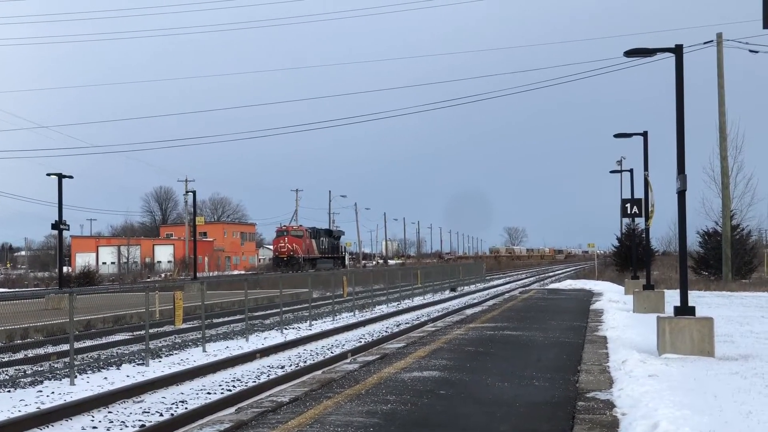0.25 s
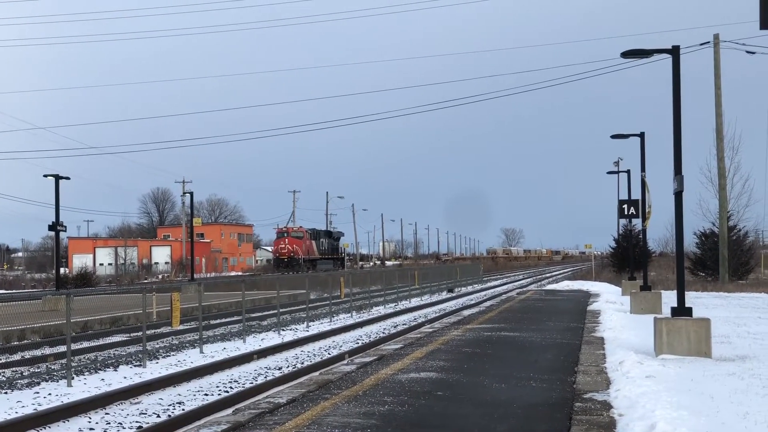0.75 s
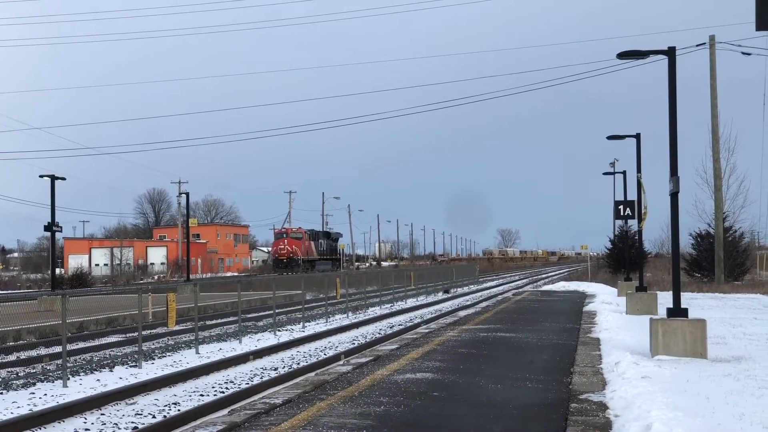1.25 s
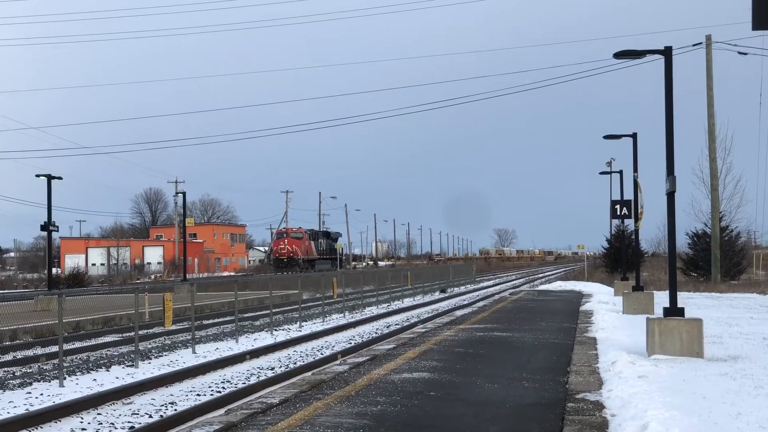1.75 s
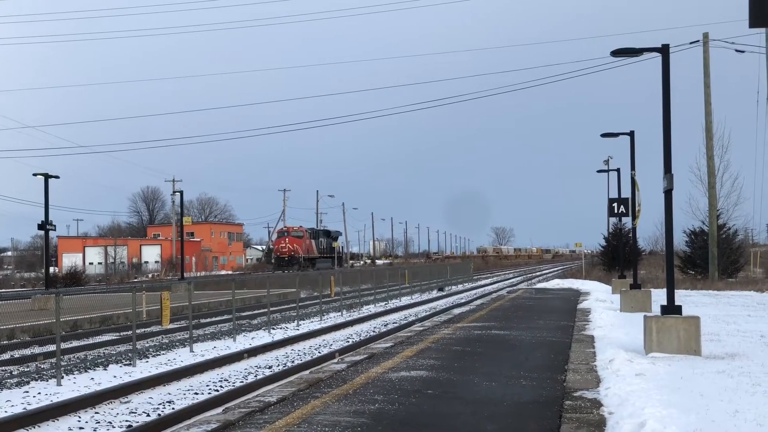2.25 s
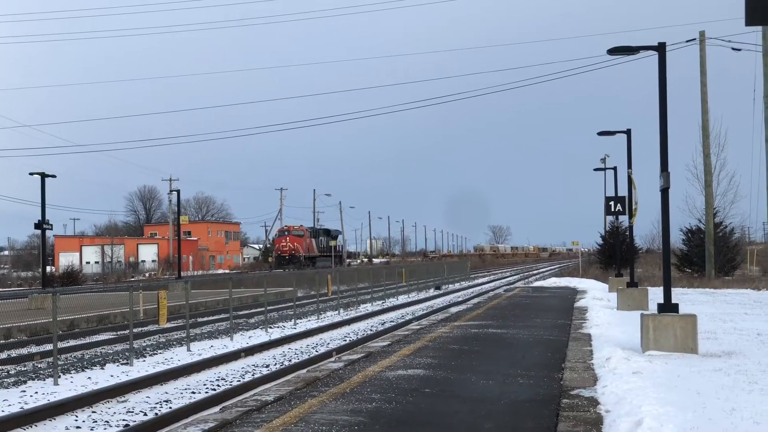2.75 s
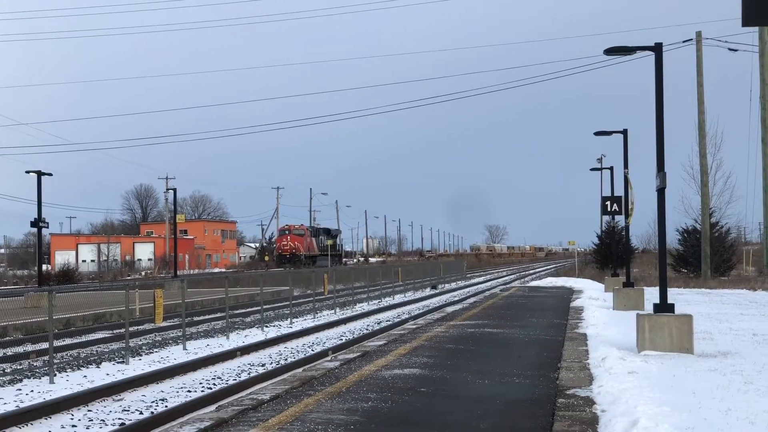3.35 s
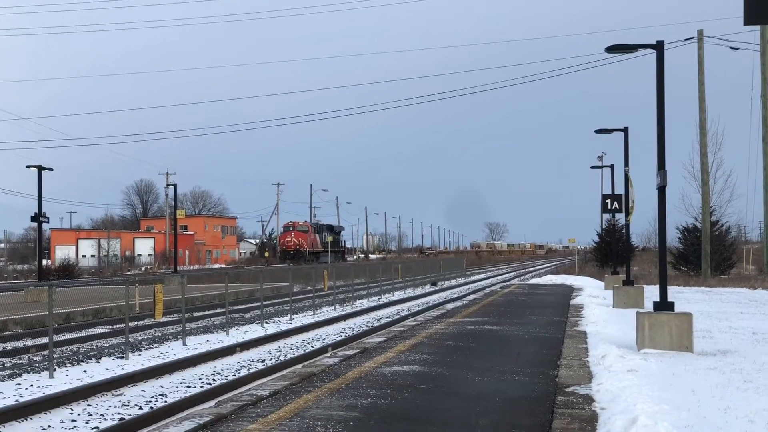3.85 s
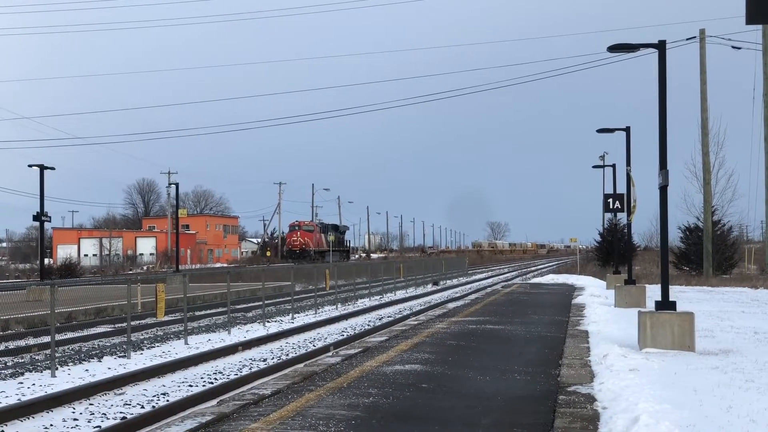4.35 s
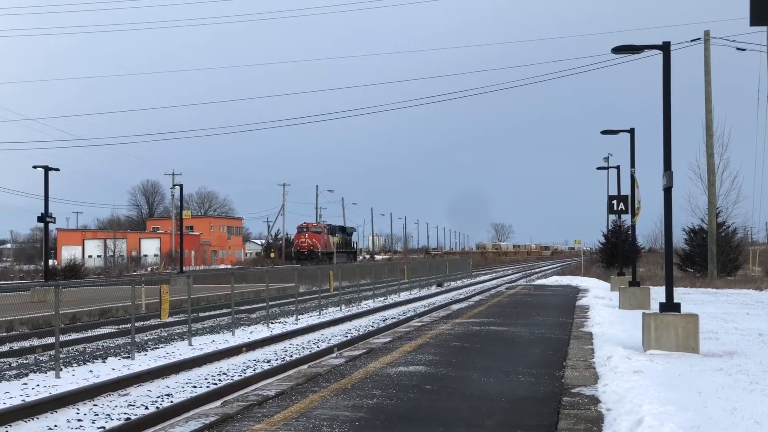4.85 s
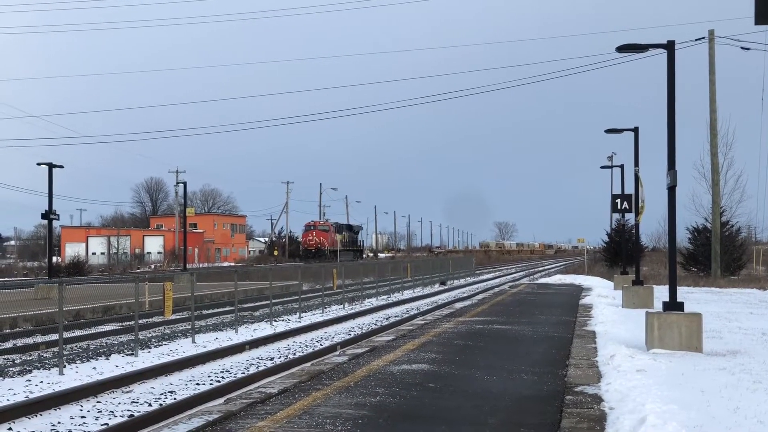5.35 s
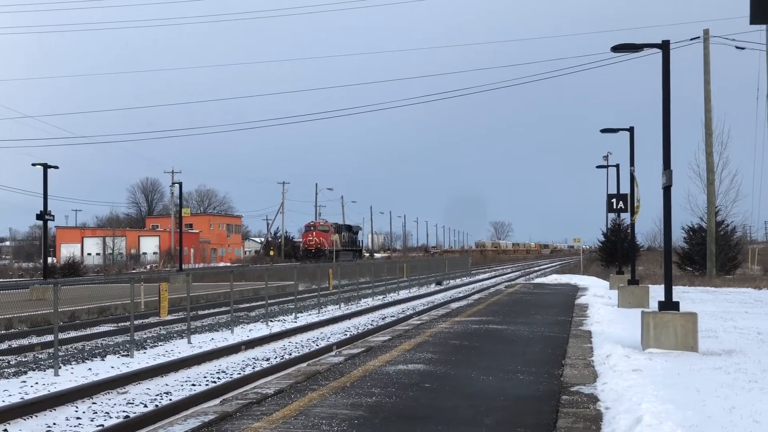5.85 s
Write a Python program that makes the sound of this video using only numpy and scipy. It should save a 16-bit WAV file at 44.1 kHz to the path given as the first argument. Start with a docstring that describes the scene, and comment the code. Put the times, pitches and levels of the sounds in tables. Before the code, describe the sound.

Low far-off engine rumble with faint fan whine and rolling roar, under breezy hiss, rustling twigs and one long buffeting gust.

```python
"""Distant diesel from a windy platform

A twelve-cylinder diesel locomotive creeps along at low throttle, far from a single microphone.
Its firing tone, overtones and chuffing gas make a throbbing drone; blade tones whine from its fans,
filtered noise makes the steady roar of machinery and wheels, and the wheels sing and squeal faintly.
Close by, shaped noise is the wind: it hisses and rustles dry twigs, and its eddies rumble and thump
on the microphone, hardest in one long gust. Faint chirps and the microphone's own hiss lie beneath."""
import sys
import numpy as np
from scipy import signal
from scipy.fft import rfft, irfft, next_fast_len
from scipy.io import wavfile
from scipy.ndimage import uniform_filter1d, map_coordinates

SR = 44100
rng = np.random.default_rng(int(sys.argv[2]) if len(sys.argv) > 2 else 0)


def store_pcm(level_fs):
    """Save levels as 16-bit WAV."""
    pcm = np.round(np.clip(level_fs, -1, 1) * 32767).astype(np.int16)
    wavfile.write(sys.argv[1], SR, np.atleast_2d(pcm).T)


N = 269451
T = np.arange(N) / SR  # time of each sample, s
CYLINDERS = 12


def amp(db):
    """Decibels to gain."""
    return 10 ** (np.asarray(db) / 20)


def unit(x):
    """Scale to rms 1."""
    return x / np.sqrt(np.mean(x ** 2) + 1e-20)


def curves(rows):
    """One value per sample, joined by straight lines, for each column after the time."""
    s, *columns = np.transpose(rows)
    return [np.interp(T, s, column) for column in columns]


def swell(s, width_s):
    """A bell that peaks at 1 at time s; width_s is its standard deviation."""
    return np.exp(-0.5 * ((T - s) / width_s) ** 2)


def wobble(rate):
    """A smooth random curve of rms 1, with rate knots a second."""
    knots = rng.standard_normal(int(N * rate / SR) + 4)
    return unit(map_coordinates(knots, [np.arange(N) * rate / SR]))


def filtered(x, response):
    """x times a response of frequency, padded so that the end does not wrap to the start."""
    m = next_fast_len(N + SR // 2)
    return irfft(rfft(x, m) * response(np.fft.rfftfreq(m, 1 / SR)), m)[:N]


def coloured(x, spectrum):
    """x shaped by (Hz, dB) points on a log axis, silent above the last."""
    f, db = np.transpose(spectrum)
    return filtered(x, lambda hz: amp(np.interp(np.log(hz + 1), np.log(f), db, right=-np.inf)))


def resonant(x, modes):
    """x through parallel (Hz, width Hz, dB) resonances, each squared for steep skirts."""
    def response(f):
        total = 0
        for centre, width, db in modes:
            peak = 1j * f * width / (centre * centre - f * f + 1j * f * width)
            total = total + amp(db) * peak ** 2
        return total
    return filtered(x, response)


def noise(patchy_db):
    """White noise that fades in patches of time and pitch, as sound does through moving air."""
    z = signal.stft(rng.standard_normal(N), nperseg=1024)[2]
    field = uniform_filter1d(rng.standard_normal(z.shape), size=6, axis=0)  # smooth across pitch
    field = uniform_filter1d(field, size=10, axis=1)  # smooth across time
    return signal.istft(z * amp(patchy_db * unit(field)), nperseg=1024)[1][:N]


def mic_hiss(floor_db=-72):
    """The microphone's own faint, steady hiss, heard between gusts."""
    spectrum = [(3000, -4.0), (11000, -3.5), (13500, -6.5), (15700, -11)]  # f/Hz, relative level/dB
    return amp(floor_db) * unit(coloured(rng.standard_normal(N), spectrum))


# Colours of the wind over the platform: f/Hz, relative level per Hz/dB
HISS_COLOUR = [(1000, -11), (2200, 4.5), (2750, -3.5), (3100, 0), (3600, 1), (4400, -4), (5200, -10),
               (7000, -28)]
FIZZ_COLOUR = [(2500, -11.5), (3900, 0), (4500, 0.5), (5100, -3), (6200, 0.5), (6650, -5), (7100, -12.5),
               (12000, -27)]
# Colour of the ticking twigs: f/Hz, relative level per Hz/dB
TWIG_COLOUR = [(2000, -10), (3500, 3), (6400, 0), (7050, -6), (7500, -1), (8000, 0), (8900, .5),
               (9800, -1.5), (11200, 0), (12300, -6), (13700, -10), (15700, -20)]
# Gusts over the platform: t/s, bell width/s, lift of hiss/dB, lift of fizz/dB, lift of rustle/dB
PLATFORM_GUSTS = [(.98, 0.22, 2.2, 6, 3.5), (1.45, 0.067, 0.52, 3, 1), (1.9, 0.43, 3.6, 4.5, 5.5),
                  (3.0, 0.032, 1.2, -1, 4), (3.24, 0.26, 4.9, 5.5, 8), (4.13, 0.19, 8.1, 7.5, 9),
                  (4.62, 0.25, 2.9, -2, -0.5), (5.15, 0.3, 4.3, 5, 2.5), (5.65, 0.077, 8, 4, 6),
                  (6.05, 0.21, 3.5, 2, 3)]
# Flurries of ticks in dry twigs: t/s, bell width/s, peak level before the flurry trim/dB
TWIG_FLURRIES = [(3.925, .012, -55), (4.035, 0.015, -48), (4.094, .018, -47.5), (4.17, .06, -61),
                 (4.275, .014, -52), (5.155, .014, -51), (5.335, .01, -52), (5.64, .022, -49),
                 (5.695, .019, -48), (5.87, .008, -55)]


def breeze(hiss_db=-57.5, fizz_db=-66, rustle_db=-74.5, flurry_db=-13, spiky=0.17, grainy_db=2, restless_db=-0.1):
    """Hiss and a finer fizz over the platform, and dry ticks in flurries; gusts add their lifts to each."""
    stir_db = 0.53 * wobble(30)  # each quick eddy moves all three together
    gust_db = sum(np.outer(lifts, swell(s, width)) for s, width, *lifts in PLATFORM_GUSTS)
    hiss_lift, fizz_lift, rustle_lift = stir_db + gust_db
    hiss = amp(hiss_db + hiss_lift) * unit(coloured(noise(patchy_db=1.5), HISS_COLOUR))
    fizz = amp(fizz_db + fizz_lift) * unit(coloured(noise(patchy_db=2.5), FIZZ_COLOUR))
    flurries = sum(amp(db + flurry_db) * swell(s, width) for s, width, db in TWIG_FLURRIES)
    steady = amp(rustle_db + rustle_lift + restless_db * wobble(48))
    rustle = np.hypot(steady, flurries)  # the two add as powers
    ticks = noise(patchy_db=0.5) * np.exp(spiky * wobble(2500)) * amp(grainy_db * wobble(220))
    return hiss + fizz + rustle * unit(coloured(ticks, TWIG_COLOUR))


# Faint chirps in the hiss: t/s, f/Hz, level/dB
HISS_CHIRPS = [(0.178, 3440, -57), (.77, 3260, -56), (1.07, 3320, -60), (1.25, 3920, -56), (1.9, 3510, -57),
               (4.04, 3380, -51), (4.11, 3520, -48.5), (4.27, 2980, -51), (4.33, 2940, -55),
               (5.33, 3540, -54), (5.52, 3550, -49.5), (5.63, 3450, -67), (5.7, 3350, -49)]


def chirps(width_s=0.0078, rasp=1.9):
    """Brief, faint chirps in the hiss, made raspy by a quick random phase (rasp in radians rms)."""
    scatter = rasp * wobble(450)
    notes = np.zeros(N)
    for s, hz, db in HISS_CHIRPS:
        notes += amp(db) * swell(s, width_s) * np.sin(2 * np.pi * hz * T + scatter)
    return np.sqrt(2) * notes


# Colours of the air on the microphone, large eddies then small: f/Hz, relative level per Hz/dB
LARGE_EDDIES = [(15, -26), (28, -25), (45, -9), (62, .5), (100, -4), (150, -6.5), (220, -16), (330, -29),
                (500, -48), (900, -44), (2000, -77)]
SMALL_EDDIES = [(50, -34), (110, -1), (160, 9), (220, 1.5), (300, -2.5), (420, -27), (560, -15), (900, -36),
                (2000, -85)]
# Gusts that reach the microphone: t/s, bell width/s, peak level/dB
MIC_GUSTS = [(.15, 0.1, -42), (.47, 0.072, -38.5), (2.39, 0.1, -39.5), (3.25, 0.5, -36),
             (4.75, 0.12, -42.5)]
LULL_DB = -46  # buffeting between gusts


def buffeting(lumpy_db=4.0, flutter_db=-6.0, brighten=3.4, flicker_db=5.0):
    """Large eddies rumble on the microphone; small ones flutter when the gust is strong."""
    gust_power = sum((amp(db) * swell(s, width)) ** 2 for s, width, db in MIC_GUSTS)
    gust_db = 10 * np.log10(amp(LULL_DB) ** 2 + gust_power)
    lumps = rng.standard_normal(N) * amp(lumpy_db * wobble(28))
    rumble = amp(gust_db) * unit(coloured(lumps, LARGE_EDDIES))
    peak_db = gust_db.max()
    small_db = peak_db + flutter_db + brighten * (gust_db - peak_db)  # falls faster than the rumble
    flicker = rng.standard_normal(N) * amp(flicker_db * wobble(70))
    return rumble + amp(small_db) * unit(coloured(flicker, SMALL_EDDIES))


def pressure_peak(u):
    """A pressure peak between two troughs."""
    return (1 - 2 * u * u) * np.exp(-u * u)


# The hardest eddies on the microphone: t/s, slap level/dB, slap f/Hz, push level/dB, push f/Hz
HARD_EDDIES = [(0.105, -40, 200, -28, 94), (.172, -31.5, 200, -34, 109), (.406, -38, 180, -24, 115),
               (.535, -38, 190, -30, 119), (2.349, -28, 200, -22.5, 97), (2.431, -23.5, 200, -23, 161),
               (2.457, -22.5, 210, -19, 126), (2.56, -33, 170, -32, 133), (2.655, -40, 200, -17.5, 81.5),
               (2.679, -30, 210, -30, 130), (2.79, -42, 200, -20, 85.3), (2.82, -26, 270, -26, 109),
               (2.843, -21, 187, -18, 89), (2.88, -23, 219.8, -29, 111), (2.922, -23.5, 167, -33, 128.8),
               (2.984, -29, 245, -17.5, 85.5), (3.03, -31, 190, -28, 110), (3.103, -28.5, 200.2, -22.5, 85),
               (3.155, -31, 290, -37, 100.5), (3.21, -23, 225, -20, 75), (3.272, -21, 260, -21, 90),
               (3.322, -23, 219.4, -20.5, 79), (3.369, -11.5, 248, -15, 91), (3.414, -24.5, 318, -29, 110),
               (3.482, -31, 235, -17, 83.5), (3.52, -19.5, 250, -15.5, 94), (3.569, -29, 200, -21, 79),
               (3.607, -21.5, 266, -24, 119), (3.627, -21, 185, -30, 132.8), (3.666, -40, 202, -19, 85),
               (3.775, -30, 180, -23, 110), (3.8, -34, 200, -21.5, 86), (3.864, -25, 226, -18, 79.5),
               (3.977, -16, 223, -24.5, 109), (4.028, -30, 199, -17.5, 87.4)]


def thumps(ragged_db=4, push_s=0.0065, lag_s=0.0037, wake_db=-13, wake_s=0.02):
    """The strongest eddies land as a quick slap, a deep push that rings briefly, and a churning wake."""
    wake = unit(coloured(rng.standard_normal(N) * amp(ragged_db * wobble(90)), SMALL_EDDIES))
    blows = np.zeros(N)
    for s, slap_db, slap_hz, push_db, push_hz in HARD_EDDIES:
        near = np.abs(T - s) < 0.15
        age = T[near] - s
        slap = pressure_peak(np.pi * slap_hz * (age - lag_s))  # small eddies slap higher
        after = np.maximum(age - lag_s - 0.5 / slap_hz, 0)
        ring = after / push_s * np.exp(1 - after / push_s)
        push = -np.sin(2 * np.pi * push_hz * after) * ring  # suction follows the slap
        churn = np.exp(-np.abs(age) / np.where(age < 0, 0.002, wake_s)) * wake[near]
        blows[near] += amp(slap_db) * (slap + amp(wake_db) * churn) + amp(push_db) * push
    return blows


# Colour of the far machinery and wheels: f/Hz, relative level per Hz/dB
ROAR_COLOUR = [(150, 2), (330, -1.5), (470, -3.5), (630, 2.5), (710, -2.5), (850, 0), (1250, -0.5),
               (1520, -5), (1900, -6.5), (2250, -19.5), (2700, -30), (5000, -36)]
# The roar drifts in level: t/s, level/dB
ROAR_DRIFT = [(0, -44), (1.8, -41), (3.1, -43.5), (3.65, -43.5), (4.2, -42), (4.7, -44), (5.5, -41),
              (6.11, -41.5)]
# Modes of the wheels: f/Hz, width/Hz, relative level/dB
WHEEL_MODES = [(797, 21, 5.5), (889, 58, -1.5), (1003, 47, 2)]
SING_S, SING_WIDTH_S, SING_DB = 5.68, 0.18, -55  # the wheels rub on the rail


def rolling(sing_floor_db=-60, roar_patchy_db=1):
    """The far roar of machinery and wheels, whose faint singing swells as they rub on the rail."""
    roar = amp(curves(ROAR_DRIFT)[0]) * unit(coloured(noise(patchy_db=roar_patchy_db), ROAR_COLOUR))
    sing = amp(sing_floor_db) + amp(SING_DB) * swell(SING_S, SING_WIDTH_S)
    return roar + sing * unit(resonant(noise(patchy_db=2.5), WHEEL_MODES))


# Notes sung by the wheels: t/s, bell width/s, f/Hz, level/dB
WHEEL_NOTES = [(5.36, .055, 802, -53.5), (5.425, .025, 882, -45.5), (5.52, .03, 798, -49),
               (5.58, .06, 1010, -54), (5.6, .025, 885, -53), (5.725, .045, 799, -48),
               (5.785, .03, 885, -52), (5.9, .03, 796, -54)]


def squeals(smear=0.25):
    """Brief, faint notes as a wheel slips on the rail and one of its modes sings (smear in radians rms)."""
    notes = np.zeros(N)
    for s, width, hz, db in WHEEL_NOTES:
        notes += amp(db) * swell(s, width) * np.sin(2 * np.pi * hz * T + smear * wobble(40))
    return np.sqrt(2) * notes


# The governor lets the speed rise, overshoot and settle: t/s, firing rate f/Hz
ENGINE_SPEED = [(0, 61.2), (.45, 61.05), (1.2, 62.4), (1.7, 63.2), (2.2, 64.3), (2.6, 65.35), (3.1, 66),
                (3.8, 67.25), (4.3, 68.65), (4.55, 68.4), (4.8, 67.6), (5.2, 66.95), (5.8, 66.3),
                (6.11, 66.4)]


def shaft():
    """Angle of the four-stroke cycle in radians; every cylinder fires once in each cycle."""
    return 2 * np.pi * np.cumsum(curves(ENGINE_SPEED)[0]) / SR / CYLINDERS


def blade_tone(pitch_hz, whine_db, smear=0.3, flutter_db=2.5, shake=0.46):
    """A fan's whine, smeared by the wind (radians rms) and shaken by every firing of the engine."""
    blade = np.sin(2 * np.pi * np.cumsum(pitch_hz) / SR + smear * wobble(40))
    shaken = 1 + shake * np.sin(CYLINDERS * shaft())
    return amp(whine_db) * unit(blade * amp(flutter_db * wobble(30)) * shaken)


# The main fan's whine: t/s, f/Hz
MAIN_FAN_PITCH = [(0, 580), (.65, 582), (1.15, 590), (1.7, 602), (2.1, 598.3), (2.6, 594), (3.05, 589),
                  (3.45, 602), (4.1, 615), (5.3, 603), (6.11, 596)]
# Its strength: t/s, level/dB
MAIN_FAN_LEVEL = [(0, -53), (.4, -64), (.7, -47.5), (1.0, -57), (1.2, -46), (1.7, -47), (2.05, -53),
                  (2.4, -49.5), (2.75, -53.5), (3.1, -45.5), (3.5, -53.5), (4.6, -61), (5.2, -54.5),
                  (5.7, -47.5), (6.11, -55)]
# Air in the fan ducts, which also guides the third harmonic: t/s, level before each trim/dB
DUCT_AIR_LEVEL = [(0, -64), (.8, -49), (2.1, -47), (2.55, -51), (3.9, -50), (5.3, -56.5), (6.11, -61)]
# Resonances of the fan ducts: f/Hz, width/Hz, relative level/dB
DUCT_MODES = [(1154, 180, -8.5), (1697, 220, -7)]
# The second fan winds up: when it is loudest, its pitch then, its climb
SECOND_FAN_S, SECOND_FAN_HZ, SECOND_FAN_HZ_PER_S = 4.69, 660, 120
SECOND_FAN_DB, SECOND_FAN_WIDTH_S = -49.5, 0.081


def fans(whirr_db=-2, third_db=-4, third_smear=1.0):
    """Two blade tones, a rough third harmonic of the main one, and air whirring in the ducts."""
    pitch_hz = curves(MAIN_FAN_PITCH)[0]
    air_db = curves(DUCT_AIR_LEVEL)[0]
    main = blade_tone(pitch_hz, curves(MAIN_FAN_LEVEL)[0])
    third = blade_tone(3 * pitch_hz, air_db + third_db, smear=third_smear)
    climb_hz = SECOND_FAN_HZ + SECOND_FAN_HZ_PER_S * (T - SECOND_FAN_S)
    second = swell(SECOND_FAN_S, SECOND_FAN_WIDTH_S) * blade_tone(climb_hz, SECOND_FAN_DB)
    whirr = amp(air_db + whirr_db) * unit(resonant(noise(patchy_db=2.0), DUCT_MODES))
    return main + third + second + whirr


# Overtones of the four-stroke cycle left by unequal cylinders:
# multiple of the cycle rate, level before trim/dB running light, level before trim/dB under load
UNEVEN_OVERTONES = [(6, -59, -59), (9, -47, -45), (10, -53, -58), (14, -45.5, -45), (16, -62, -65),
                    (17, -57, -58), (18, -49, -54), (20, -55, -51), (21, -52.5, -59), (23, -60, -62),
                    (24, -69, -59), (26, -61, -54.5), (27, -59, -52), (28, -48, -46.5), (29, -52, -55),
                    (30, -64, -69), (31, -62, -54.5), (32, -51.5, -50), (33, -50, -62), (34, -53, -55),
                    (35, -71, -57), (36, -64, -60), (38, -64, -55.5), (39, -68, -56), (42, -69, -64),
                    (45, -56.5, -63), (46, -74, -52.5), (48, -78, -61), (49, -66, -56.5), (50, -61, -60),
                    (51, -61, -58.5), (52, -60.5, -52.5), (53, -68, -60), (54, -65, -66), (56, -60, -63),
                    (58, -63, -68), (63, -78, -63.5)]
# The firing tone: t/s, level/dB
FIRING_LEVEL = [(0, -33), (.35, -38.5), (.8, -32.5), (1.25, -28.7), (1.7, -26.5), (2.2, -27), (2.33, -32.5),
                (2.68, -28.5), (2.9, -31), (3.15, -26), (3.4, -32), (3.7, -30), (3.9, -31.5), (4.45, -26),
                (4.75, -32), (5.15, -34), (5.45, -29.5), (5.75, -28), (6.11, -29)]
# The overtone that beats against the firing tone: t/s, level/dB
THROB_LEVEL = [(0, -34.5), (.6, -36.5), (1.1, -36), (1.8, -41), (2.35, -32.5), (2.9, -43), (3.5, -39),
               (4.0, -36.5), (4.6, -45), (5.25, -43), (5.7, -38), (6.11, -44)]
# Gas flow from the stack: t/s, level before the chuff trim/dB
GAS_LEVEL = [(0, -54), (2.1, -51.5), (4.35, -38), (5.15, -48), (5.65, -42), (6.11, -51.5)]
# Colour of that gas: f/Hz, relative level per Hz/dB
STACK_COLOUR = [(40, 0), (65, -3), (105, -15), (130, -34), (168, -16), (225, -17.5), (260, 0.5), (295, 1.5),
                (340, -19), (480, -14), (900, -56)]
THROB_MULTIPLE = 15  # of the cycle rate
FIRST_THROB_S = 0.04977  # the throb first peaks here
LOAD_S, LOAD_RISE_S = 2.7, 1.24  # the engine takes up load: when it starts, how long it takes


def diesel(surge=0.38, fade_db=0.5, waver_db=1.33, overtone_db=0.5, chuff_db=-2.5, chuff_depth=0.69):
    """Firing tone, overtones of the unequal cylinders, and gas chuffing from the stack."""
    cycle = shaft()
    beat = cycle - np.interp(FIRST_THROB_S, T, cycle)
    firing = CYLINDERS * beat + surge * np.cos(beat)  # the shaft speeds and slows once a cycle
    firing_db = curves(FIRING_LEVEL)[0] + fade_db * wobble(7.0)  # moving air makes the far tone fade
    drone = amp(firing_db) * np.sin(firing)
    drone += amp(curves(THROB_LEVEL)[0]) * np.sin(THROB_MULTIPLE * beat)  # three beats a cycle
    load = np.clip((T - LOAD_S) / LOAD_RISE_S, 0, 1)
    for multiple, light_db, loaded_db in UNEVEN_OVERTONES:
        db = overtone_db + light_db + load * (loaded_db - light_db) + waver_db * wobble(2.584)
        drone += amp(db) * np.sin(multiple * cycle + rng.uniform(0, 2 * np.pi))
    gas = noise(patchy_db=-1.0) * (1 + chuff_depth * np.sin(firing))
    chuff = amp(curves(GAS_LEVEL)[0] + chuff_db) * unit(coloured(gas, STACK_COLOUR))
    return np.sqrt(2) * drone + chuff


def scene():
    """The wind, the chirps and the locomotive at one microphone, over its own hiss."""
    wind = breeze() + buffeting() + thumps()
    locomotive = rolling() + squeals() + fans() + diesel()
    return (mic_hiss() + wind + chirps() + locomotive)[None]


TOP_HZ = 15700  # the recorder's band limit


def record(dry):
    """The recorder thins the deepest bass and keeps nothing above its band limit."""
    from_ends = np.minimum(np.arange(N), np.arange(N)[::-1])
    ease = np.minimum(1, from_ends / (0.002 * SR))  # 2 ms fades at both ends

    def band(hz):
        return (hz < TOP_HZ) * hz ** 4 / np.sqrt(hz ** 8 + 33 ** 8)  # bass falls away below 33 Hz
    return filtered(dry[0] * ease, band)[None]


dry = scene()
out = record(dry)
store_pcm(out)
```